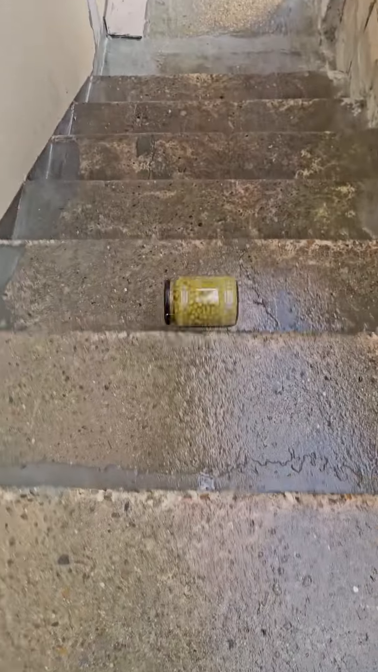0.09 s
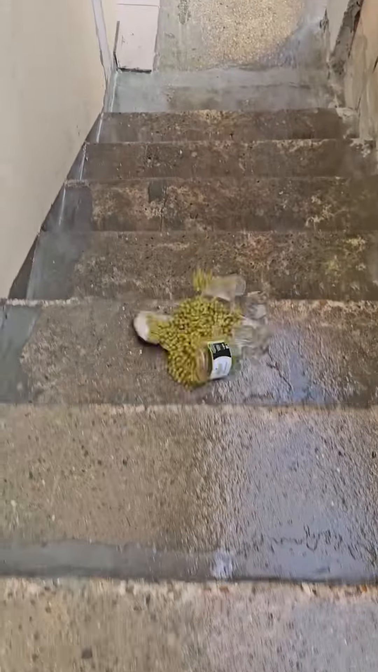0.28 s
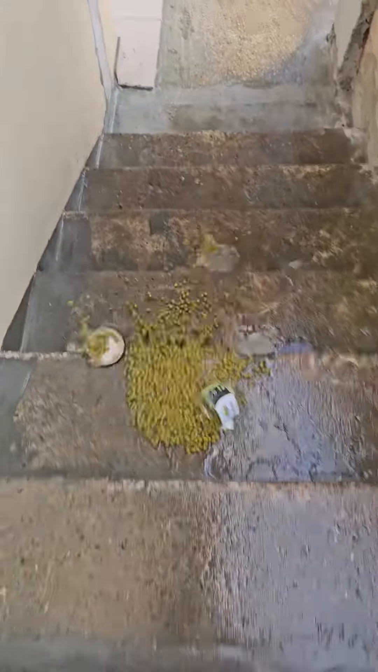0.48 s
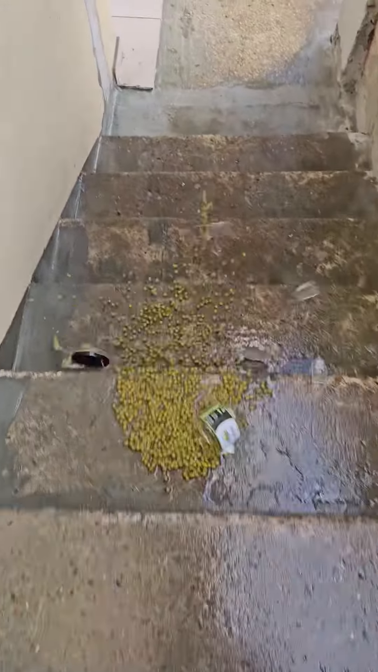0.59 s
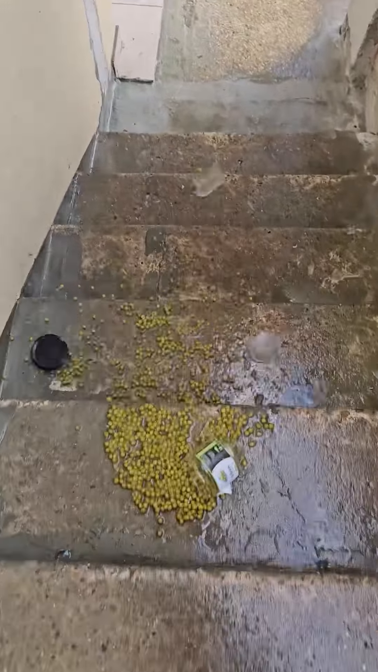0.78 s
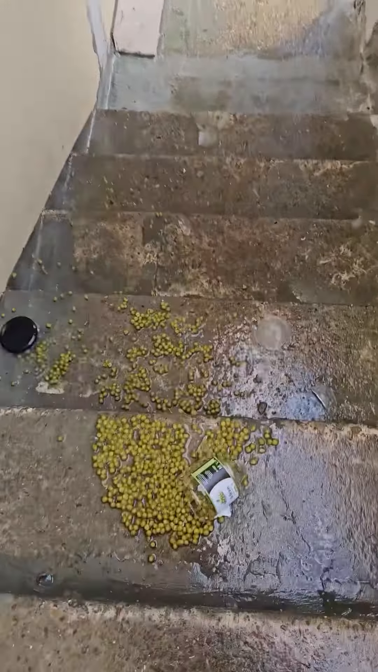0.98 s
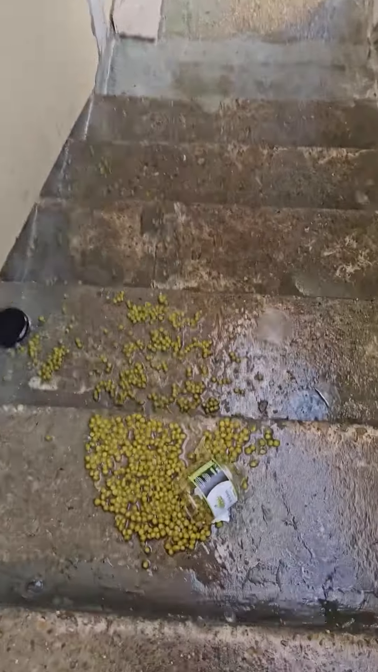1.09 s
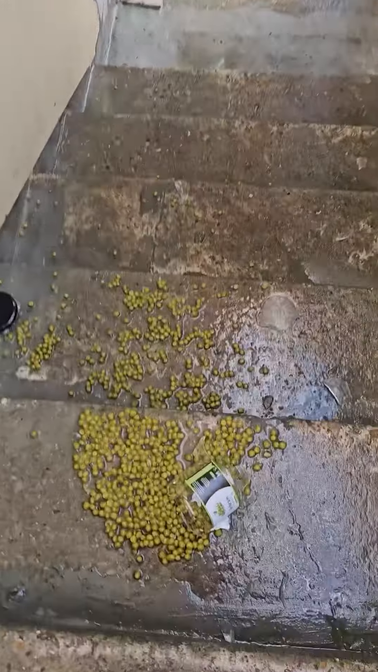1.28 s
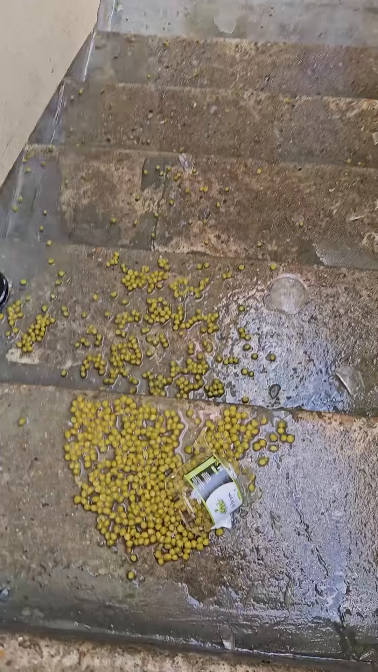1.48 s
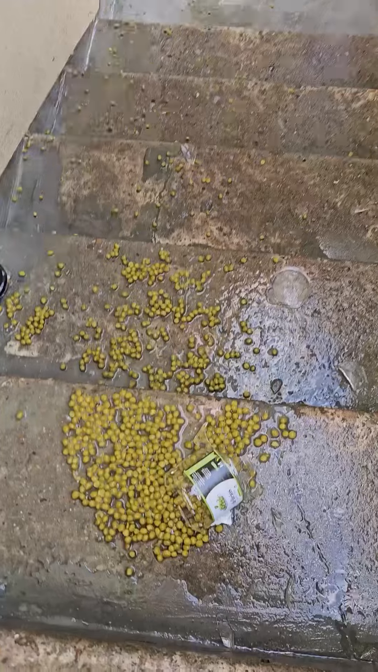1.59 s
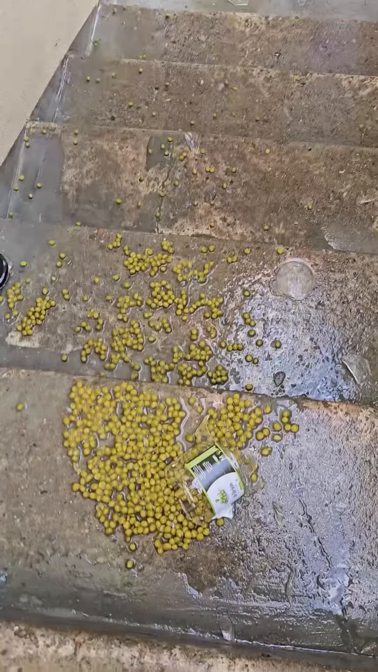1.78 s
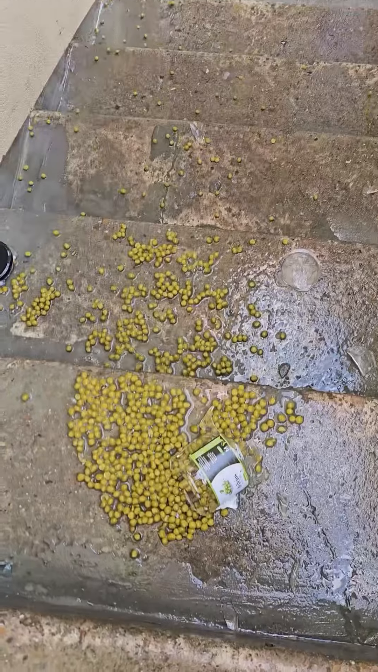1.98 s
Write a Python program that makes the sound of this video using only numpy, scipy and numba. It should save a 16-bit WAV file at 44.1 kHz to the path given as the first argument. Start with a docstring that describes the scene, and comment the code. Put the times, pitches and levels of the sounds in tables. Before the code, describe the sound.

A glass jar full of peas smashes on concrete steps at 0.23 s: hard crack, short dull thud, spray of fine glass. The metal lid knocks at 0.3 s and rolls until 0.6. Wet slops and another lid knock come near 0.7, then bright shards clatter densely 0.75-1.05. The lid scrapes 0.9-1.4, a strong clink at 1.34, then sparse faint tinkles over low air rumble, with a short outdoor stairwell reflection.

```python
"""A glass jar of peas in brine smashes on outdoor concrete steps, beside a wall: a thud and a spray,
then shards bounce and ring, peas slop down, and the metal lid rolls and skitters over faint air rumble.
Struck bodies are decaying sine modes; cracks, spray, slops and rumble are coloured noise.
The lid is narrow-band noise and ticks through a moving resonance; steps and wall add a noise tail."""
import sys
import numpy as np
from scipy import signal
from scipy.fft import rfft, irfft
from scipy.io import wavfile
from numba import njit

SR = 44100
rng = np.random.default_rng(int(sys.argv[2]) if len(sys.argv) > 2 else 0)


def transcribe(u):
    """Save the signal u as a 16-bit wav file named by the first command-line argument.

    u: samples, shape (n,) or (channels, n), limited to [-1, 1]; the rate is SR.
    q: integer samples, one column per channel.
    """
    v = np.clip(np.atleast_2d(u).T, -1, 1)
    q = np.round(v * 32767).astype(np.int16)
    wavfile.write(sys.argv[1], SR, q)


N = 90405
T = np.arange(N) / SR
SMASH_S = 0.2298
PORT_PHASE_RAD = 1.4  # scale of the phase gap between the two microphone ports


def from_db(db):
    """Decibels to gain."""
    return 10 ** (np.asarray(db) / 20)


def rms_one(x):
    """Scale to rms 1."""
    return x / np.sqrt(np.mean(x ** 2) + 1e-20)


def at_hz(points, hz):
    """Read a table on a log-frequency axis."""
    f, v = np.transpose(points)
    return np.interp(np.log(hz + 1), np.log(f), v)


def level(rows):
    """Gain over time from (time [s], level [dB]) rows."""
    return from_db(np.interp(T, *np.transpose(rows)))


def dying(start_s, t60_s):
    """Envelope that jumps to 1 at start_s and decays exponentially."""
    return (T >= start_s) * np.exp(-np.log(1000) * np.clip((T - start_s) / t60_s, 0, 10))


def noise(spectrum, grain_db=0, modes=()):
    """Coloured, grainy stereo noise of rms 1; given modes, it gathers around them and fades below."""
    # left-right likeness: (frequency [Hz], correlation [-1 to 1])
    likeness = [(50, 0.98), (250, 0.99), (700, 0.67), (1400, 0.36), (2500, 0), (16000, 0.083)]
    chatter_width_hz, chatter_db = 55, 16
    hz = np.fft.rfftfreq(N, 1 / SR)

    knots = np.arange(0, N, 32)  # one grain value per 0.7 ms
    draws = np.minimum(rng.exponential(1, len(knots)), 4)
    grains = from_db(grain_db * np.interp(np.arange(N), knots, draws))

    gain = from_db(at_hz(spectrum, hz))
    if modes:
        peaks = 1
        for f, db, _ in modes:
            peaks = peaks + from_db(chatter_db + db / 2) / (1 + ((hz - f) / chatter_width_hz) ** 2)
        lowest_hz = min(modes)[0]
        gain = gain * peaks / np.hypot(1, (lowest_hz / 2 / (hz + 1)) ** 2)

    mid, side = rfft(rng.standard_normal((2, N)) * grains) * gain
    alike = np.clip(at_hz(likeness, hz), -1, 1)
    ports = np.sqrt(1 + alike) * mid + np.sqrt(1 - alike) * side * [[1], [-1]]
    return rms_one(irfft(ports, N))


def ring(start_s, modes, spread_rad, flutter=0):
    """Decaying modes struck at start_s; each may flutter, and reaches the two ports out of step."""
    strike_spread_db, rise_s, flutter_rate_hz = 1.5, 0.0016, 130
    out = np.zeros((2, N))
    start = max(int(start_s * SR), 0)
    t = T[:min(N - start, SR // 3)]
    for hz, db, t60_s in modes:
        strength, turn = rng.standard_normal(2)
        path = rng.standard_normal(63) + 1j * rng.standard_normal(63)
        # half the phase gap to each port, never less than spread_rad in all
        apart = spread_rad * (np.sign(turn) + turn / 4) * np.array([[.5], [-.5]])
        spin = 1 + flutter * np.interp(t * flutter_rate_hz, np.arange(len(path)), path)
        decay = np.exp((2j * np.pi * hz - np.log(1000) / t60_s) * t)
        tone = spin * decay * (1 - np.exp(-t / rise_s))
        gain = from_db(db + strike_spread_db * strength)
        out[:, start:start + len(t)] += gain * (tone * np.exp(1j * apart)).imag
    return out


def smash():
    """The full jar lands: a noise crack, a spray of fine glass and a thud of low modes."""
    # crack and spray spectrum: (frequency [Hz], level [dB])
    burst_spectrum = [(200, -15.5), (500, -1.5), (1200, 1), (2800, 2), (4500, -2), (8000, -5.5),
                      (12000, -15), (16000, -6)]
    # thud modes: (frequency [Hz], level [dB], t60 [s])
    thud_modes = [(130.5, -18.5, 0.089), (193.4, -9, 0.061), (237.3, -10.5, 0.056), (267.8, -13.5, 0.11),
                  (327, -13, 0.093), (437, -22, 0.16)]
    crack_db, crack_t60_s, crack_grain_db = -4.5, 0.029, 6.5
    spray_db, spray_t60_s, spray_grain_db = -19.5, 0.49, 2
    thud_delay_s = 0.00195
    crack = from_db(crack_db) * dying(SMASH_S, crack_t60_s) * noise(burst_spectrum, crack_grain_db)
    spray = from_db(spray_db) * dying(SMASH_S, spray_t60_s) * noise(burst_spectrum, spray_grain_db)
    thud = ring(SMASH_S + thud_delay_s, thud_modes, spread_rad=0.13)
    return crack + spray + thud


def shards():
    """Each bounce is a sharp tick, a gritty chatter coloured by that piece, and its ring."""
    # modes of each shard, by name: (frequency [Hz], level [dB], t60 [s])
    shard_modes = { "splinter": [(7775, 0, .13), (11370, -18, .1)], "chip": [(11370, 0, .11),
                   (11080, -3, .1), (5040, -10, .12)], "flake": [(5900, 0, .18), (6422, -5, .17)],
                   "heel": [(3775, 0, .24)], "shoulder": [(2620, -10, .08), (5790, -3, .09),
                   (6110, -1, .08), (7283, -2, .1), (7821, -4, .11), (8252, -6, .1)],
                   "wall": [(2490, -5, .06), (4578, -13, .3), (5220, 0, .24), (5900, -10, .1),
                   (8195, -8, .15), (11590, -12, .13), (12660, -15, .15)], "neck": [(2734, -2, .12),
                   (3870, -15, .18), (4597, -9, .1), (6237, -1, .13), (7935, 0, .12), (9200, -13, .12),
                   (12900, -15, .14)], "flank": [(3757, 0, .23), (5230, -10, .28), (5955, -9, .22),
                   (6480, -12, .14), (7983, 1, .15), (11475, -7, .11), (12690, -9, .09), (13805, -4, .08),
                   (15500, -11, .09)], "sliver": [(2347, -4, .14), (4575, 0, .18), (6406, -8, .16),
                   (8215, -4, .09), (10225, -10, .16), (11400, -9, .2)], "base": [(2345, -21, .15),
                   (3792, -13, .13), (5900, -24, .27), (7286, 0, .13), (15630, -7, .07)],
                   "rim": [(7275, 0, .2), (11110, -12, .14)], }
    # strikes on the concrete: (time [s], shard name, ring level [dB], crack level [dB])
    bounces = [ (0.303, "shoulder", -26, -24.5), (0.362, "chip", -25, -48), (0.475, "shoulder", -44, -15.5),
               (0.4832, "shoulder", -39, -13.5), (0.518, "chip", -48, -26), (.55, "chip", -23.5, -35),
               (0.6359, "wall", -29, -43), (.6765, "splinter", -20.5, -25), (0.689, "neck", -32, -18),
               (.739, "splinter", -20, -54), (.776, "wall", -38, -20.5), (.783, "wall", -13, -18.5),
               (0.831, "splinter", -18.5, -29), (.876, "wall", -19, -23), (.884, "shoulder", -22.5, -17),
               (0.9, "neck", -15.5, -17), (.923, "neck", -25.5, -22.5), (1.016, "flank", -16, -11.5),
               (1.034, "flank", -32, -21.5), (1.122, "sliver", -32, -31.5), (1.181, "sliver", -29, -32.5),
               (1.186, "flank", -33.5, -34), (1.229, "sliver", -28.5, -53), (1.343, "base", -13, -17),
               (1.36, "base", -38, -32.5), (1.445, "rim", -26.5, -37), (1.465, "flake", -36, -64),
               (1.565, "heel", -54.5, -45), (1.593, "chip", -80, -50), (1.688, "rim", -39, -51),
               (1.78, "heel", -57, -52.5), (1.898, "flake", -49.5, -60), (1.922, "heel", -54.5, -59.5),
               (2.029, "flake", -57, -56)]
    # tick and chatter spectrum: (frequency [Hz], level [dB])
    crack_spectrum = [(400, -9.5), (1200, -8.5), (2600, 2), (3300, -1.5), (5500, 0), (7500, 5),
                      (9500, -4.5), (12000, 1), (15500, -7.5)]
    tick_t60_s, chatter_t60_s, chatter_rise_s = 0.0094, 0.097, 0.0007
    grain_db, tumble_depth = -2, 0.6

    chatter = {name: noise(crack_spectrum, grain_db, modes) for name, modes in shard_modes.items()}
    grit = noise(crack_spectrum, grain_db)
    out = np.zeros((2, N))
    for start_s, name, ring_db, crack_db in bounces:
        rise = np.clip((T - start_s) / chatter_rise_s, 0, 1)
        tick = dying(start_s, tick_t60_s) * grit
        crack = tick + dying(start_s, chatter_t60_s) * rise * chatter[name]
        out += from_db(ring_db) * ring(start_s, shard_modes[name], PORT_PHASE_RAD, tumble_depth)
        out += from_db(crack_db) * crack
    return out


def tinkles():
    """Tiny splinters land at random, ever rarer and fainter, each with three brief high notes."""
    count, span_s, t60_s = 480, 1.15, 0.04
    loudest_db, spread_db, fall_db_per_s = -35, 21, 10
    low_hz, high_hz = 4154, 13060
    out = np.zeros((2, 2 * N))
    t = T[:SR // 25]
    fade = from_db(-60 * t / t60_s)
    for when, size, side, *pitches in rng.random(size=(count, 6)):
        delay_s = span_s * when ** 2  # crowds the landings toward the smash
        notes_hz = low_hz * (high_hz / low_hz) ** np.array(pitches)
        apart = PORT_PHASE_RAD * (side - .5) * np.array([[1], [-1]])
        notes = sum(np.sin(2 * np.pi * f * t + apart) for f in notes_hz)
        gain = from_db(loudest_db - fall_db_per_s * delay_s - spread_db * size)
        start = int((SMASH_S + delay_s) * SR)
        out[:, start:start + len(t)] += gain * fade * notes
    return out[:, :N]


def peas():
    """Peas and brine: wet slaps of decaying noise, and soft pattering as the peas spread."""
    # slaps: (time [s], level [dB], t60 [s])
    slaps = [(0.01, -32.5, 0.081), (0.634, -37.5, 0.14), (0.685, -30.5, 0.19), (0.719, -21.5, 0.11),
             (0.776, -35.5, 0.3), (0.868, -39.5, 0.63)]
    # slap spectrum: (frequency [Hz], level [dB])
    slap_spectrum = [(150, -34.5), (450, 4.5), (800, -4.5), (1200, -0.5), (1900, 1), (2800, -4.5),
                     (3800, -12), (9000, -14.5)]
    # rolling peas: (time [s], level [dB])
    patter_level = [(0, -37), (.13, -66), (.22, -46.5), (.27, -38), (.4, -49.5), (.6, -53), (.8, -49.5),
                    (1.1, -55.5), (1.45, -52), (1.7, -56), (2.05, -73)]
    # patter spectrum: (frequency [Hz], level [dB])
    patter_spectrum = [(100, -0.5), (280, -2), (600, -7.5), (1200, -17), (3000, -18.5), (8000, -18),
                       (16000, -25.5)]
    envelope = sum(from_db(db) * dying(start_s, t60_s) for start_s, db, t60_s in slaps)
    slop = envelope * noise(slap_spectrum, grain_db=3.5)
    return slop + level(patter_level) * noise(patter_spectrum, grain_db=4)


def lid_roll():
    """The rough step keeps one mode of the rolling lid sounding: narrow-band noise, evened in level."""
    # lid singing on its rim: (time [s], level [dB])
    roll_level = [(.3, -96), (.325, -32), (.365, -43), (.385, -29), (.43, -36.5), (.48, -31.5),
                  (.56, -62.5), (.6, -99)]
    centre_hz, width_hz = 1150, 117
    edges_hz = [centre_hz - width_hz / 2, centre_hz + width_hz / 2]
    band = signal.butter(2, edges_hz, "band", fs=SR, output="sos")
    tone = rms_one(signal.sosfilt(band, rng.standard_normal(N)))
    evened = tone / (np.abs(signal.hilbert(tone)) + .5)
    return level(roll_level) * rms_one(evened)


@njit
def moving_resonance(x, w, r):
    """A two-pole resonance whose centre w [rad/sample] moves; r is the pole radius."""
    y = np.zeros(len(x))
    for i in range(2, len(x)):
        y[i] = x[i] - x[i - 2] + 2 * r * np.cos(w[i]) * y[i - 1] - r * r * y[i - 2]
    return y


def lid_skitter():
    """Rim ticks and rasp excite a hollow resonance that sinks as the lid slows."""
    # scrape to rest: (time [s], resonance [Hz], level [dB])
    skitter = [(.87, 2360, -71), (0.921, 2430, -41.5), (1.041, 2460, -43.5), (1.121, 2445, -35.5),
               (1.16, 2410, -43), (1.19, 2280, -33), (1.245, 2310, -40), (1.26, 1820, -39),
               (1.305, 1582, -45), (1.34, 1420, -41.5), (1.44, 1200, -74)]
    ticks_per_s, width_hz, rasp = 130, 115, 0.052
    times_s, hz, db = np.transpose(skitter)
    ticks = (rng.random(N) < ticks_per_s / SR) * rng.choice([-1, 1], N)
    drive = ticks + rasp * rng.standard_normal((2, N))
    w = 2 * np.pi * np.interp(T, times_s, hz) / SR
    r = np.exp(-np.pi * width_hz / SR)
    scrape = rms_one(np.array([moving_resonance(port, w, r) for port in drive]))
    return scrape * from_db(np.interp(T, times_s, db)) * (T > times_s[0])


def lid_knocks():
    """Hollow knocks of the lid, one decaying mode each."""
    # knocks: (time [s], frequency [Hz], level [dB], t60 [s])
    knocks = [(.284, 2220, -20.5, 0.096), (.295, 2046, -7, 0.026), (0.717, 2810, -12, 0.029),
              (0.719, 1174, -32.5, 0.22), (.725, 467, -30.5, 0.11), (.905, 1159, -31, 0.17),
              (.91, 2242, -27.5, 0.12), (1.383, 588, -23.5, .07)]
    return sum(ring(start_s, [(hz, db, t60_s)], spread_rad=0.2) for start_s, hz, db, t60_s in knocks)


def stairs(x):
    """Steps and wall scatter a short noise tail, the treble dying first."""
    gain_db, delay_s, t60_s, treble_t60_s, split_hz = -9.5, 0.00057, 0.3, 0.18, 5000
    low_pass = signal.butter(2, split_hz, fs=SR, output="sos")
    high_pass = signal.butter(2, split_hz, "high", fs=SR, output="sos")
    low = signal.sosfilt(low_pass, rng.standard_normal((2, N)))
    high = signal.sosfilt(high_pass, rng.standard_normal((2, N)))
    tail = low * dying(delay_s, t60_s) + high * dying(delay_s, treble_t60_s)
    unit_energy = rms_one(tail) / np.sqrt(N)
    return from_db(gain_db) * signal.fftconvolve(x, unit_energy, axes=1)[:, :N]


def rumble():
    """Air on the microphone: low noise that swells and sinks."""
    # rumble spectrum: (frequency [Hz], level [dB])
    rumble_spectrum = [(20, -25), (35, 1), (50, 1), (70, -1), (110, -8.5), (200, -22), (500, -29),
                       (1500, -36.5), (6000, -39.5), (16000, -57)]
    # rumble course: (time [s], level [dB])
    rumble_level = [(0, -39), (.17, -45), (.42, -39.5), (.6, -49), (.78, -48), (.84, -37), (.95, -50.5),
                    (1.36, -48), (1.43, -38.5), (1.5, -53), (1.85, -48.5), (2.0, -46.5)]
    return level(rumble_level) * noise(rumble_spectrum)


def scene():
    """Glass, peas and lid on the steps, over rumbling air."""
    glass = smash() + shards() + tinkles()
    lid = lid_roll() + lid_skitter() + lid_knocks()
    direct = glass + peas() + lid
    return direct + stairs(direct) + rumble()


def record(dry):
    """The left port hears more treble; peaks are rounded by tanh and the top is cut."""
    # port balance: (frequency [Hz], left minus right [dB])
    balance = [(100, 0), (500, 1.6), (1500, -0.5), (4000, 2), (7500, 4), (14000, 4)]
    cutoff_hz = 15900
    lean_db = at_hz(balance, np.fft.rfftfreq(N, 1 / SR))
    ports = irfft(rfft(dry) * from_db(np.array([lean_db, -lean_db]) / 2), N)
    low_pass = signal.ellip(10, .2, 80, cutoff_hz, fs=SR, output="sos")
    return signal.sosfilt(low_pass, np.tanh(ports))


dry = scene()
out = record(dry)
transcribe(out)
```